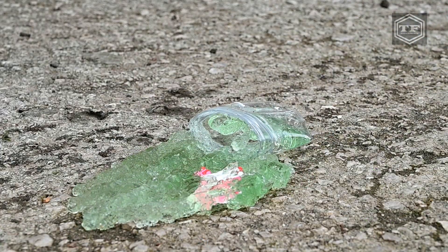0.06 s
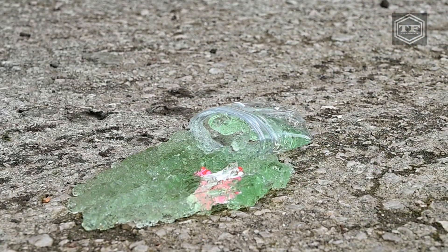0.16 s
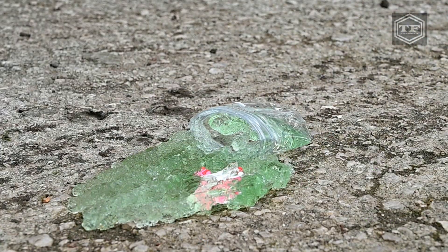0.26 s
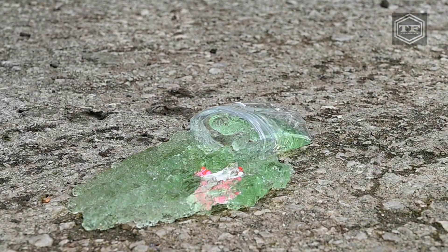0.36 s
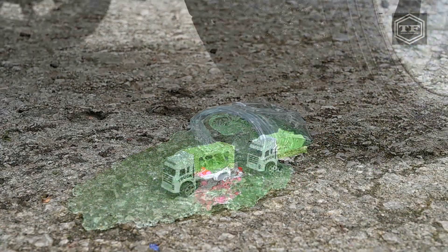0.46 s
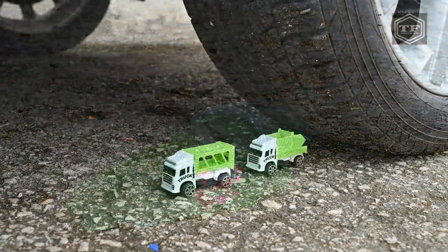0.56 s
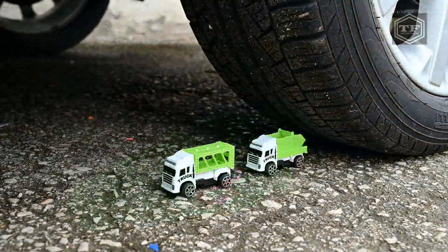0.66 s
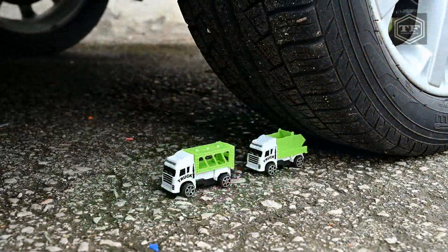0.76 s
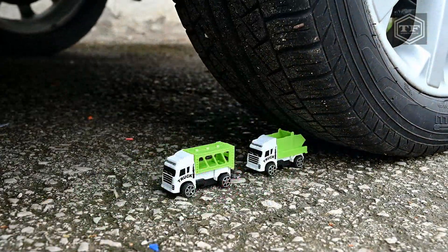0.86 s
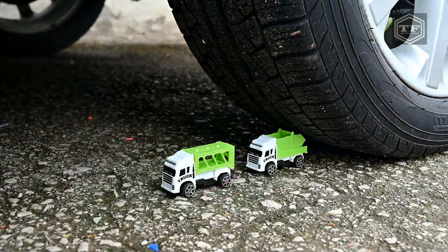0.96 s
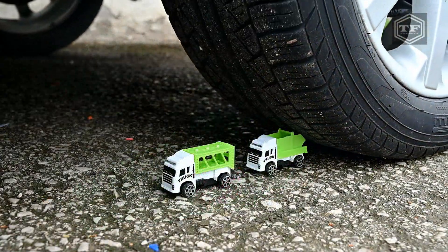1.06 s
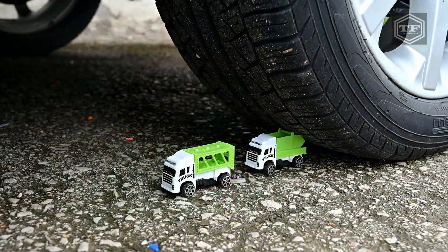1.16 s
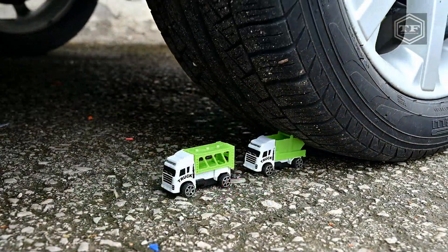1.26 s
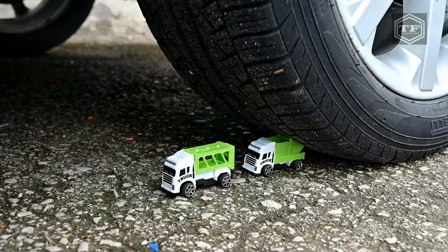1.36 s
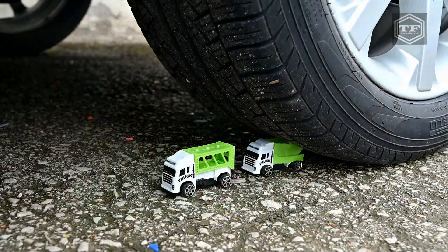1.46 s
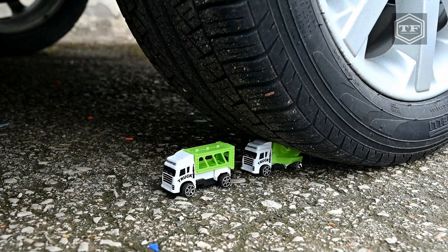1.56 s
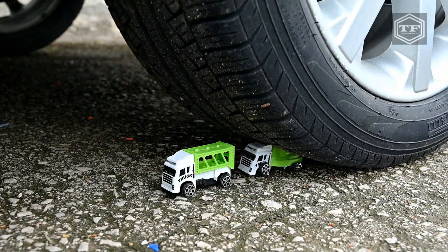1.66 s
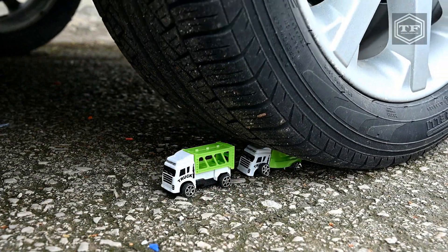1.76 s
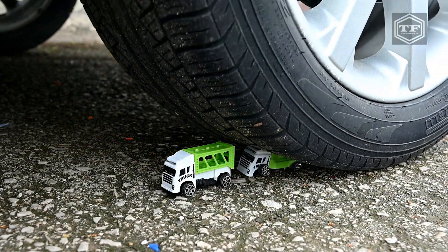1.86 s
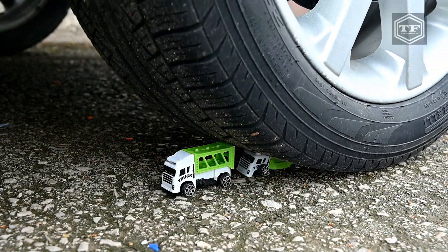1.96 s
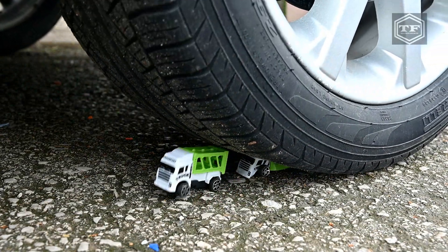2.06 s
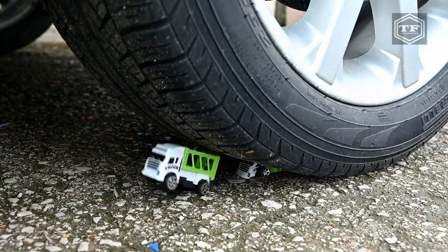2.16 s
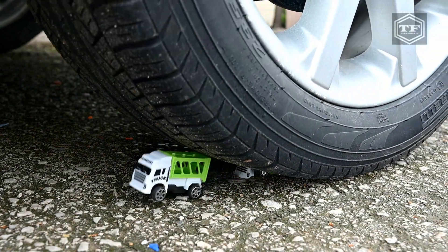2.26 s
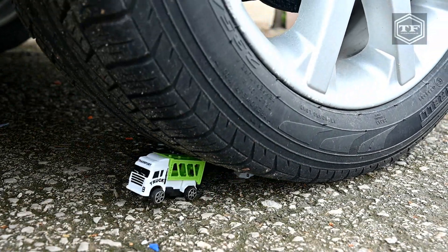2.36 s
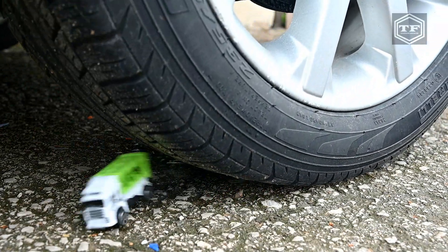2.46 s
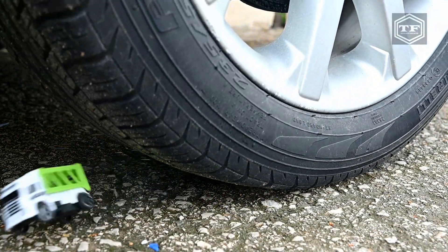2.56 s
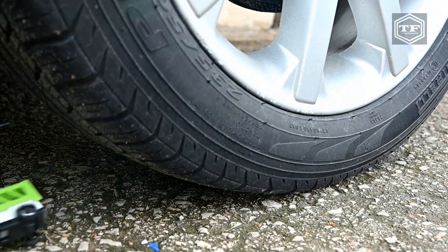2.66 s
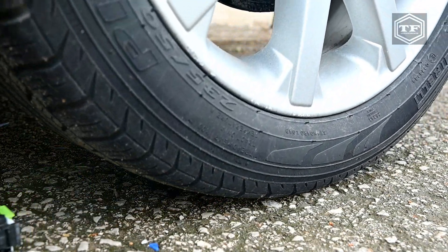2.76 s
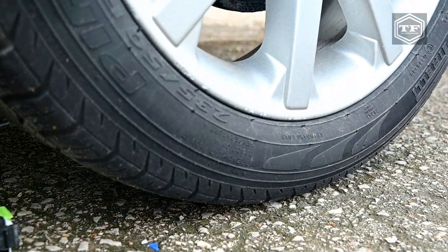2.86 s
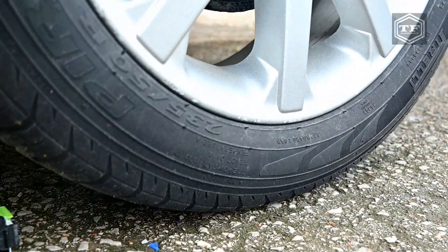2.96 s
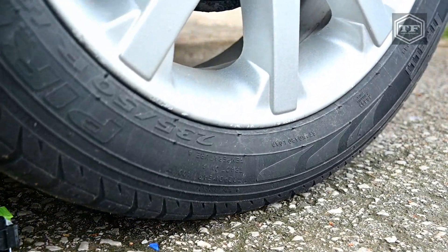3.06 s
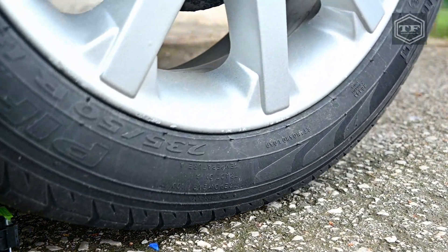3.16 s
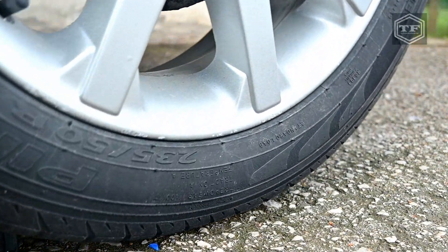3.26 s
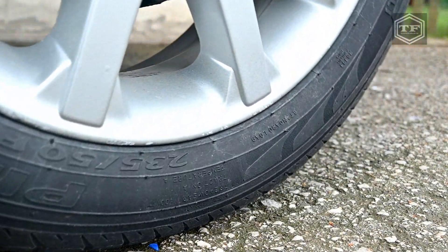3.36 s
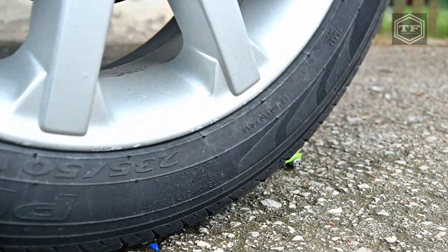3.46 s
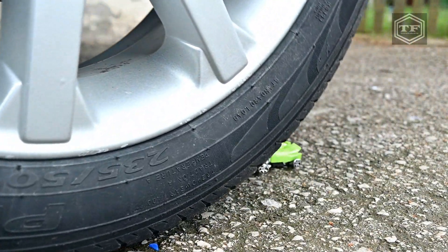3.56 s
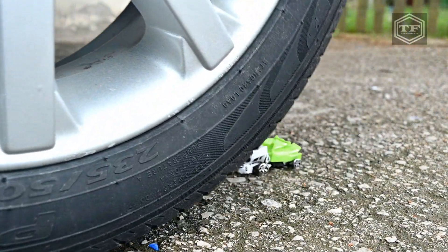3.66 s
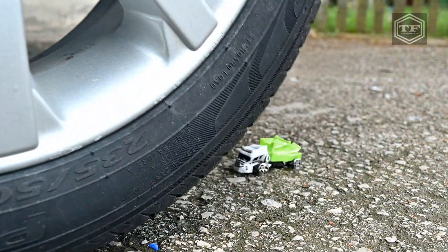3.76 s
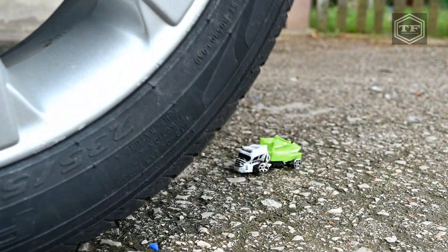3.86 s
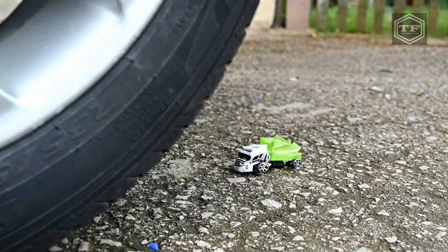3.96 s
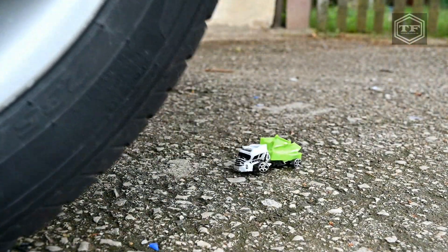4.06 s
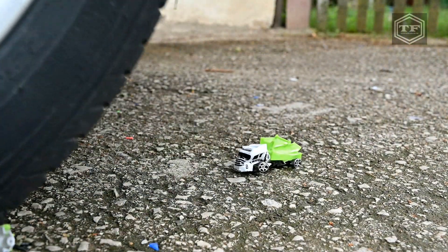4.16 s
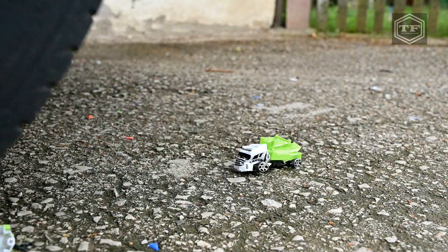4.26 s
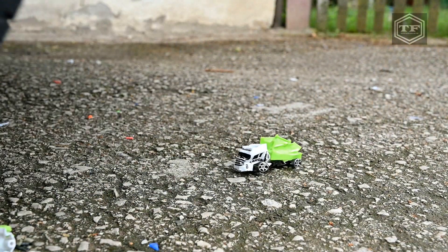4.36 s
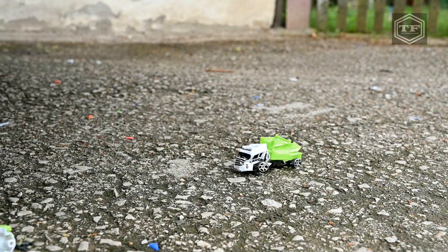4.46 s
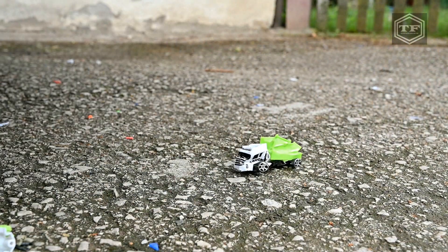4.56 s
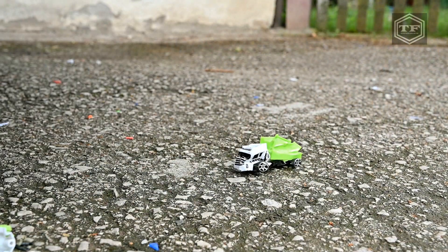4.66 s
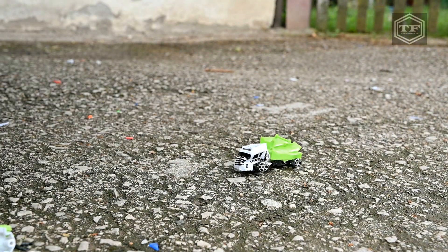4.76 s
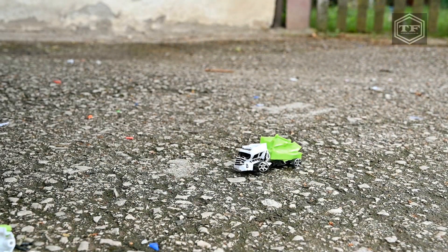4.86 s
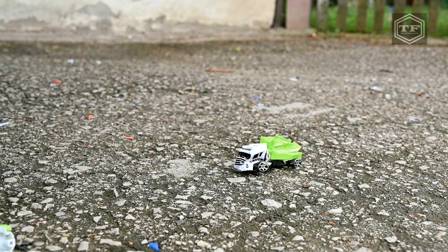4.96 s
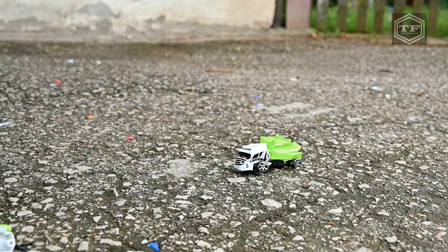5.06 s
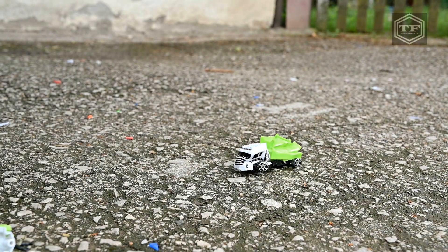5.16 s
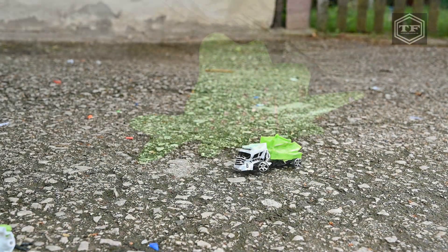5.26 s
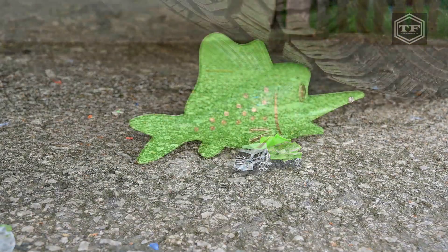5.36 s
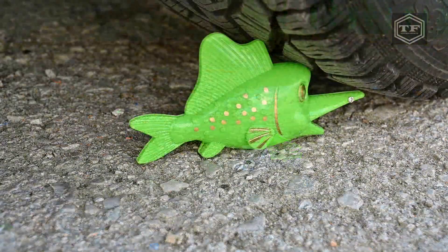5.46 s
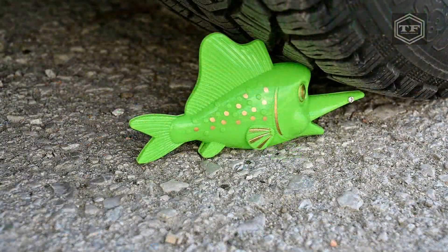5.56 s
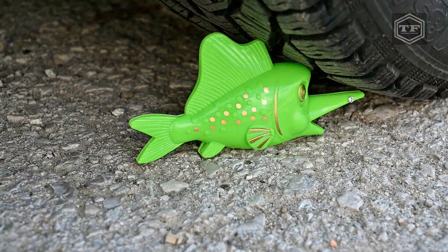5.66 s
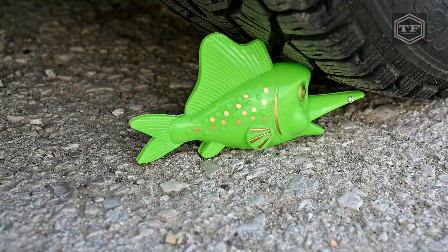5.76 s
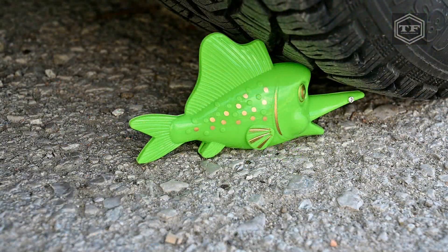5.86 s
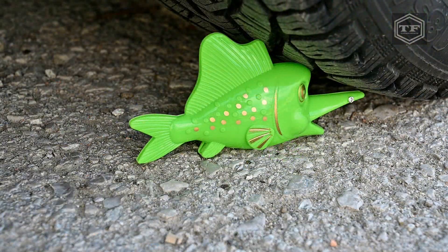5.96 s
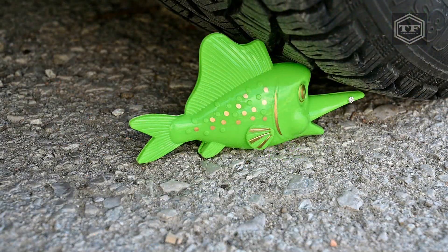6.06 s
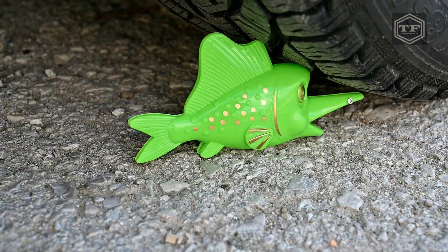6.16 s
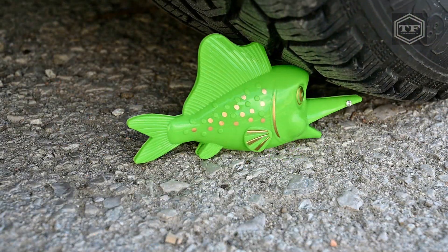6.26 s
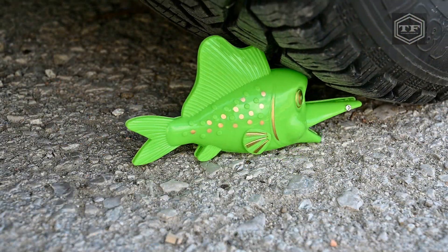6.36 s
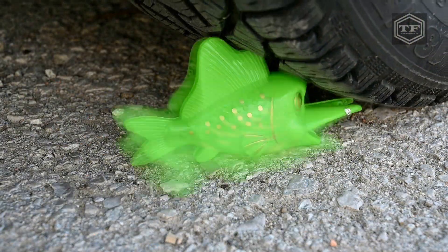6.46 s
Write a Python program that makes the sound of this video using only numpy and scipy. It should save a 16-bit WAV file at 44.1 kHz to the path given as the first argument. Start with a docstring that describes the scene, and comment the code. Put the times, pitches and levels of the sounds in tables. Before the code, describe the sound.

Close up outdoors on rough asphalt. Low rumble and a brief wet fizz come first, then a faint bird trill. A slow car tyre cracks thin plastic in scattered sharp snaps, and after a near pause a denser, louder crunch with a heavy thud. Grit ticks and an engine drones faintly. A thin high brake squeal follows, then distant birds whistle and another hard plastic toy snaps.

```python
"""Car crushing plastic toys

A car creeps over two small plastic toy trucks on rough asphalt, then onto a hollow plastic fish, up close.
Each break is a snap and a run of noisy slips, ringing splinters, the shell wall and the air in the tyre.
Shaped noise makes the rumble, scrubbing tread, crackling sand, wet slime, still air and far bird chorus.
Sines make the engine drone, a faint hum, soft tyre thuds, one thin brake squeal and the whistled birdsong.
The shells crack loudly enough to overload the microphone input."""
import sys
import numpy as np
from scipy import signal
from scipy.fft import rfft, irfft, next_fast_len
from scipy.io import wavfile
from scipy.ndimage import uniform_filter1d, map_coordinates

SR = 44100
rng = np.random.default_rng(int(sys.argv[2]) if len(sys.argv) > 2 else 0)


def to_wav(sig):
    """Store sig (one row per channel, or 1-D mono) as 16-bit WAV at the path in sys.argv[1].

    Samples outside -1..1 are clipped; the rate is SR.
    """
    pcm = np.clip(np.atleast_2d(sig), -1, 1) * 32767
    pcm = np.round(pcm).astype(np.int16)
    wavfile.write(sys.argv[1], SR, pcm.T)  # frames by channels


N = 287091

# breaks of plastic: (t/s, knock level/dB, crack level/dB, fizz level/dB, tearing time/s)
BREAKS = [(1.4487, -25, -28, -8.5, 0.0083), (1.4696, -38.5, -27.5, -14.5, 0.011),
          (1.5645, -61.5, -69.5, -30.5, 0.004), (1.6184, -16, -17, -8.5, 0.0064),
          (1.6942, -24, -20, -7.5, 0.0037), (1.7125, -38.5, -38, -16, 0.0053),
          (1.8187, -38.5, -37, -42.5, 0.0044), (2.0823, -45, -44.5, -37.5, 0.0078),
          (2.2691, -16, -16.5, -10.5, 0.011), (2.3104, -12, -17, -12.5, 0.0082),
          (2.3523, -62, -42, -29.5, 0.0011), (2.4433, -35, -36.5, -34.5, 0.006),
          (2.4934, -18, -15, -16.5, 0.012), (2.5297, -24.5, -28, -18.5, 0.0072),
          (2.6006, -30.5, -51, -33.5, 0.0068), (2.6117, -35, -41, -39, 0.0052),
          (2.6654, -31, -31.5, -20, 0.0066), (2.7791, -54, -33.5, -38, 0.0088),
          (3.132, -54.5, -50, -34, 0.0022), (3.2489, -49, -46, -30, 0.0037),
          (3.3556, -29.5, -32.5, -27, 0.0085), (3.3822, -21.5, -32.5, -20, 0.0093),
          (3.41, -17, -29, -24, 0.0065), (3.4928, -30, -28.5, -25, 0.011), (3.5083, -20, -33, -49, 0.0062),
          (3.5216, -33, -34, -30, 0.0038), (3.587, -15.5, -27.5, -23, 0.006),
          (3.6056, -14.5, -18, -10.5, 0.012), (3.6196, -20, -23, -12.5, 0.0046),
          (3.6711, -8.5, -19.5, -7, 0.023), (3.6966, -10, -11, -10.5, 0.0095),
          (3.709, -16, -18, -12.5, 0.0074), (3.7717, -12.5, -26, -30, 0.0081),
          (3.7968, -19.5, -38.5, -25.5, 0.0083), (3.8193, -28, -40, -30.5, 0.0054),
          (3.9256, -20.5, -29.5, -18.5, 0.0062), (4.161, -37.5, -36, -37.5, 0.0018),
          (4.213, -35.5, -36.5, -37, 0.011), (4.2372, -36.5, -39, -27.5, 0.013),
          (6.36, -17.5, -19, -23.5, 0.0033), (6.4039, -40, -32, -15, .0028),
          (6.4384, -29.5, -19.5, -16, 0.003), (6.4949, -38, -35.5, -39, 0.0032)]
# sand grinding under the load: (t/s, level/dB)
SAND_GRINDING = [(0, -53), (.6, -65.5), (.85, -72.5), (1.4, -71.5), (1.65, -47.5), (1.9, -65.5),
                 (2.15, -57.5), (2.3, -44.5), (2.7, -53.5), (3, -73), (3.3, -62), (3.75, -38.5), (4, -59.5),
                 (4.24, -46), (4.5, -68.5), (4.9, -63.5), (5.8, -85.5), (6.3, -71)]
# how alike left and right are: (f/Hz, likeness from 0 to 1)
LEFT_RIGHT_LIKENESS = [(60, 1), (500, 0.9), (1000, 0.8), (2500, 0.3), (12000, 0.65)]


def amp(db):
    """Decibels to gain."""
    return 10 ** (np.asarray(db) / 20)


def unit(x):
    """Scale to rms 1."""
    return x / np.sqrt(np.mean(x ** 2) + 1e-20)


def burst(x):
    """Scale a short sound to the energy of 10 ms at rms 1."""
    return unit(x) * np.sqrt(SR / 100 / x.shape[-1])


def along(points, hz):
    """Read (f/Hz, value) points on a logarithmic frequency axis."""
    f, values = np.transpose(points)
    return np.interp(np.log(hz + 1), np.log(f + 1), values)


def curves(rows):
    """Draw one curve over the whole sound for each column after the time."""
    times, *columns = np.transpose(rows)
    return [np.interp(np.arange(N) / SR, times, column) for column in columns]


def wobble(rate):
    """A smooth random curve with rate knots a second."""
    knots = rng.standard_normal(int(N * rate / SR) + 4)
    return map_coordinates(knots, [np.arange(N) * rate / SR])


def fade(t, t60):
    """Free decay, 60 dB down after t60 seconds."""
    return np.exp(-np.log(1000) * t / np.maximum(t60, 1e-4))


def filtered(x, response):
    """Multiply the spectrum of x by a function of frequency."""
    n = x.shape[-1]
    m = next_fast_len(n + 4096)
    return irfft(rfft(x, m) * response(np.fft.rfftfreq(m, 1 / SR)), m)[..., :n]


def coloured(x, bands):
    """Colour x by the summed power of (dB, shape) bands, without smearing sound ahead of an attack."""
    hz = np.fft.rfftfreq(1024, 1 / SR)
    power = sum((amp(db) * unit(amp(along(shape, hz)))) ** 2 for db, shape in bands)
    gain = np.sqrt(power)
    # folding the cepstrum gives the minimum-phase filter, whose energy comes first
    fold = np.r_[1, np.full(511, 2), np.zeros(512)]
    response = irfft(np.exp(rfft(irfft(np.log(gain)) * fold)))
    shaped = signal.fftconvolve(x, response[None], axes=1)[:, :x.shape[1]]
    return np.sqrt(np.mean(gain ** 2)) * burst(shaped)


def add(track, s, x):
    """Mix a stereo sound in at time s."""
    i = min(max(round(s * SR), 0), N - 1)
    track[:, i:i + x.shape[-1]] += x[..., :N - i]


def balance(db):
    """Left and right gains that differ by db, positive towards the left."""
    return amp([[db / 2], [-db / 2]])


def tone(hz):
    """A sine of rms 1 along a pitch curve."""
    return np.sqrt(2) * np.sin(2 * np.pi * np.cumsum(hz) / SR)


def rush(spectrum, grain_db=0):
    """Stereo noise of rms 1; grain_db scatters the sizes of its tiny impulses."""
    pair = rng.standard_normal((2, N)) * amp(grain_db * rng.standard_normal(N))

    def mid_side_gain(hz):
        angle = np.arccos(np.clip(along(LEFT_RIGHT_LIKENESS, hz), -1, 1)) / 2
        return amp(along(spectrum, hz)) * np.array([np.cos(angle), np.sin(angle)])

    mid, side = filtered(pair, mid_side_gain)
    return unit(np.array([mid + side, mid - side]))


def exhaust_rumble():
    """Low noise from the exhaust swells and sinks."""
    # loudness: (t/s, level/dB)
    loudness = [(0, -38), (.25, -56), (.43, -30), (.6, -35.5), (.75, -53.5), (1.25, -66.5), (1.5, -60),
                (1.66, -45.5), (1.9, -54), (2.55, -44.5), (3, -56), (3.72, -42.5), (4.05, -50),
                (5.1, -53.5), (5.45, -45), (5.8, -72.5), (6.2, -45), (6.51, -47.5)]
    # spectrum: (f/Hz, level/dB per Hz)
    spectrum = [(11, -31), (18, 6), (45, -6.5), (80, -10), (220, -21), (290, -44), (480, -120)]
    return amp(curves(loudness)[0] + 1.3 * wobble(2.0)) * rush(spectrum)


def tread_scrub():
    """The tread scrubs the asphalt in grainy noise."""
    # loudness: (t/s, level/dB)
    loudness = [(0, -45.5), (.62, -47), (.76, -71.5), (1.25, -68), (1.65, -57), (2.1, -69), (2.5, -45),
                (2.95, -66), (3.2, -66), (3.52, -42), (3.8, -39), (4, -54.5), (4.4, -61), (5.25, -55),
                (5.65, -65.5), (6.03, -63), (6.2, -45), (6.36, -63.5)]
    # spectrum: (f/Hz, level/dB per Hz)
    spectrum = [(65, -21.5), (110, 7), (167, -10.5), (224, 2.5), (312, -9.5), (355, -7), (417, -9.5),
                (1160, -12.5), (2940, -22.5), (3500, -25.5), (4550, -54), (7700, -120)]
    return amp(curves(loudness)[0] + 3.7 * wobble(30)) * rush(spectrum, grain_db=6.0)


def sand_crackle():
    """Sand crackles under the load: noise impulses of very uneven size, quickly changing in level."""
    # spectrum: (f/Hz, level/dB per Hz)
    spectrum = [(600, -16), (1500, 2), (3000, 2), (6000, 1), (10000, 0), (16000, -4)]
    level_db = curves(SAND_GRINDING)[0] - 1 + 2.5 * wobble(90)
    return amp(level_db) * rush(spectrum, grain_db=8)


def outdoor_air():
    """Still outdoor air is a steady, faint noise."""
    # spectrum: (f/Hz, level/dB per Hz)
    spectrum = [(20, 0), (110, -1), (260, -13), (500, -17), (1200, -17), (2000, -23), (3500, -23),
                (6000, -25), (10000, -28), (16000, -33)]
    return amp(-64) * rush(spectrum)


def hum():
    """A faint hum of one unsteady pitch comes and goes."""
    # hum: (t/s, level/dB, f/Hz)
    path = [(0, -58.5, 338.5), (.12, -44, 357.6), (.2, -53, 386), (.3, -79.5, 363), (5.2, -85.5, 354.8),
            (5.5, -66.5, 346.4), (6.05, -69, 341), (6.3, -63, 352)]
    level_db, hz = curves(path)
    return amp(level_db + 1.6 * wobble(36)) * tone(hz * (1 + 0.0045 * wobble(65)))


def engine():
    """Two orders of the idling engine drone, each wavering in pitch."""
    # loudness: (t/s, level/dB)
    loudness = [(0, -65), (1.3, -77), (2.8, -66), (3.5, -66), (4.1, -54.5), (4.6, -63), (5.2, -73),
                (5.5, -80.5)]
    # engine lines: (f/Hz, level/dB)
    orders = [(160, -1.5), (208, -5)]
    level = amp(curves(loudness)[0] + 2.8 * wobble(14.0))
    return level * sum(amp(db) * tone(hz * (1 + 0.018 * wobble(9.7))) for hz, db in orders)


def bird_chorus():
    """Far birds blur into a twittering band of noise."""
    # loudness: (t/s, level/dB)
    loudness = [(0, -57), (1.15, -75.5), (1.4, -81.5), (5.3, -75), (5.45, -64.5), (5.95, -59),
                (6.35, -60.5), (6.51, -66)]
    # spectrum: (f/Hz, level/dB per Hz)
    spectrum = [(2500, -32), (3800, -16.5), (4500, -2.5), (4950, -2.5), (5400, -10.5), (6500, -14),
                (8000, -42.5)]
    return amp(curves(loudness)[0] + 1.4 * wobble(29)) * rush(spectrum)


def thuds():
    """Soft, damped low thuds: the tyre bumps on the ground, some as a shell gives way."""
    # bumps: (t/s, level/dB, f/Hz)
    bumps = [(0.014, -33.5, 143), (0.462, -29.5, 165), (0.536, -27, 310), (0.82, -35.5, 269),
             (1.449, -23.5, 239), (1.619, -28.5, 180), (2.323, -28.5, 139), (2.492, -21, 206),
             (2.521, -21, 129.3), (3.384, -30, 185), (3.434, -23, 155), (3.698, -19, 81.8),
             (3.719, -10, 148), (5.149, -40, 268.1), (6.127, -31, 285), (6.15, -32.5, 165),
             (6.211, -29.5, 121)]
    cycles = 16  # a beat dies by 60 dB within this many cycles
    out, t = np.zeros((2, N)), np.arange(SR // 3) / SR
    for s, db, hz in bumps:
        beat = np.sin(2 * np.pi * hz * t)
        beat = beat + .2 * np.sin(2 * np.pi * hz * .62 * t)
        beat = beat + .3 * np.sin(2 * np.pi * hz * 1.7 * t)
        soft_attack = 1 - np.exp(-t / 0.0035)
        add(out, s, amp(db) * beat * fade(t, cycles / hz) * soft_attack)
    return out


def yard(x, stretch=1):
    """The underbody and the house wall echo x as a fading noise tail, with its own decay at each pitch."""
    # decay of the echo: (f/Hz, t60/s)
    decay = [(150, 0.35), (500, 0.12), (1400, 0.19), (4000, 0.16), (10000, 0.1), (16000, 0.011)]
    hz, t, z = signal.stft(rng.standard_normal((2, SR // 2)), SR, nperseg=256)
    z = z * fade(t, stretch * along(decay, hz)[:, None])
    tail = signal.istft(z, SR, nperseg=256)[1]
    tail = tail * (1 - np.exp(-np.arange(tail.shape[1]) / SR / 0.00091))
    # the bass arrives alike on both sides
    middle = tail.mean(axis=0)
    tail = middle + filtered(tail - middle, lambda f: 1 - np.clip(along(LEFT_RIGHT_LIKENESS, f), 0, 1) ** 2)
    return signal.fftconvolve(x, tail / np.linalg.norm(tail[0]), axes=1)[:, :N]


def shard(t, t60, ring_db, count=14):
    """A splinter answers one slip with a click and a few short modes of its own."""
    hz = np.exp(rng.uniform(np.log(1500), np.log(15000), (count, 1)))
    # the two sides hear somewhat different phases
    phase = rng.uniform(0, 2 * np.pi, (count, 1)) + .6 * rng.standard_normal((2, count, 1))
    modes = np.sin(2 * np.pi * hz * t + phase) * fade(t, t60 * np.sqrt(hz.mean() / hz))
    click = burst(1.0 * (t == 0))
    return click + amp(ring_db) * burst(modes.sum(axis=1))


def fracture(knock_db, crack_db, fizz_db, knock_hz, tearing):
    """One break: a first snap, then clumps of smaller slips, heard in the splinters and the shell wall."""
    # wall modes: (ratio to knock pitch, level/dB, t60/s)
    wall_modes = [(0.549, -17.5, 0.025), (.8, -4.5, 0.01), (1.001, 11.5, 0.026), (1.22, 8, 0.009),
                  (1.548, -4.5, 0.015)]
    # colours of the dull body, crack and fizz: (f/Hz, level/dB)
    body_band = [(120, -24), (350, -9), (750, 2.5), (1350, 0.5), (1900, -11), (3500, -29)]
    crack_band = [(300, -30), (1200, -6.5), (2000, -1.5), (3200, 2), (5600, 1.5), (6800, -3.5), (9000, -23)]
    fizz_band = [(2000, -28), (4000, -9.5), (5500, -4), (9000, 1.5), (13000, -0.5), (16000, -3.5)]
    snap_t60, even_tearing = .0016, .0045  # s; at this tearing time snap and slips weigh the same
    scatter_t60, scatter_db = .08, -12  # scatter: decay in s, level for a tearing time of 6.7 ms

    t = np.arange(SR // 10) / SR
    common, apart, sizes = rng.standard_normal((3, len(t)))
    clumps = amp(3.0 * unit(uniform_filter1d(sizes, size=20)))
    run = np.exp(-t / tearing) * clumps
    pair = np.array([common + .32 * apart, common - .32 * apart])
    # a shorter, cleaner break puts more of its energy into the first snap
    snap = (even_tearing / tearing) ** 1.5
    slips = burst(snap * burst(pair * fade(t, snap_t60)) + burst(run * pair))
    # the wheel arch and the ground scatter each break for some tens of milliseconds
    scatter = burst(rng.standard_normal((2, len(t))) * fade(t, scatter_t60))
    slips = slips + amp(scatter_db) * np.sqrt(tearing / 0.0067) * scatter
    bright = signal.fftconvolve(slips, shard(t, t60=.0025, ring_db=-8), axes=1)[:, :len(t)]
    crack = coloured(bright, [(knock_db - 4, body_band), (crack_db + .5, crack_band), (fizz_db + 1.6, fizz_band)])

    wall = np.zeros(len(t))
    for ratio, db, t60 in wall_modes:
        level = amp(db + rng.normal(0, 0.5))
        hz = knock_hz * ratio * rng.normal(1, 0.068)
        wall += level * np.sin(2 * np.pi * hz * t) * fade(t, t60)
    blow = snap * burst(1.0 * (t == 0)) + 0.22 * slips.mean(axis=0)
    knock = signal.fftconvolve(wall, blow)[:len(t)]
    left, right = amp(knock_db - 2.0) * burst(knock) + balance(1.8) * crack
    lag = rng.integers(0, 5)  # the right side hears it up to four samples later
    return np.array([left, np.pad(right, (lag, 0))[:len(t)]])


def pebbles(count=26):
    """Small stones caught at random, following the grinding load: (t/s, knock dB, crack dB, fizz dB)."""
    times = (np.arange(count) + rng.random(count)) / count * N / SR
    # 7 dB over the sand curve, with chance scatter
    levels = np.interp(times, *np.transpose(SAND_GRINDING)) + 7 + 3.5 * rng.standard_normal(count)
    return list(zip(times, levels - 3, levels, levels))


def grit():
    """Stones shift and tick under the tread, each a small fracture."""
    # single stone ticks at set times: (t/s, knock level/dB, crack level/dB, fizz level/dB)
    stones = [(0.1031, -50, -41.5, -44.5), (0.2161, -42.5, -57.5, -69), (0.5893, -55, -58, -44.5),
              (0.62, -43.5, -57, -53.5), (0.9201, -61, -56, -64), (0.966, -59, -52, -62),
              (1.188, -45.5, -52.5, -57), (1.2632, -57.5, -46.5, -56), (1.9345, -55, -50.5, -43.5),
              (2.1685, -57, -39, -49), (2.8289, -52, -42.5, -54.5), (4.0239, -47, -42.5, -54),
              (4.1023, -50, -46, -46), (4.2661, -41, -42.5, -36.5), (4.41, -59.5, -57, -47.5),
              (5.1037, -44.5, -44, -50.5), (5.284, -47.5, -49, -49.5), (6.2328, -45, -48, -67)]
    stone_hz, slip_s = 1050, .0045  # middle knock pitch in Hz, slip time in s
    out = np.zeros((2, N))
    for s, knock_db, crack_db, fizz_db in list(stones) + pebbles():
        add(out, s, fracture(knock_db, crack_db, fizz_db, stone_hz * rng.lognormal(0, .2), slip_s))
    return out


def squelch():
    """Slime pressed from a cup spits out in a short wet fizz of grainy noise."""
    # loudness: (t/s, level/dB)
    loudness = [(.4, -120), (.43, -85), (.446, -33), (.453, -24.5), (.475, -27), (.495, -31), (.515, -43.5),
                (.56, -60), (.65, -120)]
    # spectrum: (f/Hz, level/dB per Hz)
    spectrum = [(240, -40), (400, -6), (598, -24), (676, 1.5), (826, -15.5), (2180, -9), (3020, -16.5),
                (5350, -9.5), (7060, -15.5), (10400, -2.5), (16000, -14)]
    return amp(curves(loudness)[0] + 0.67 * wobble(200)) * rush(spectrum, grain_db=8.0)


def trill(count=7):
    """An even run of faint falling notes, as timed rows."""
    # one note: (length/s, start f/Hz, middle f/Hz, end f/Hz, level/dB)
    note = (0.16, 5347, 4648.5, 4199, -75.5)
    start_s, period_s = .708, .066
    return [(start_s + k * period_s, *note) for k in range(count)]


def birdsong():
    """After a falling trill, a distant bird whistles slurred phrases between arched calls: gliding sines."""
    # phrase: (t/s into the phrase, length/s, start f/Hz, middle f/Hz, end f/Hz, level/dB)
    phrase = [(0, .11, 6700, 6000, 6200, -58), (.078, .038, 4250, 5800, 4700, -51),
              (.097, .05, 4600, 3900, 3270, -49)]
    # when the phrase begins: (t/s)
    phrase_starts = [5.529, 6.018]
    # one low whistle: (t/s, length/s, start f/Hz, middle f/Hz, end f/Hz, level/dB)
    low_whistle = (5.943, .06, 3305, 3090, 2970, -55)
    # shape of an arched call: (length/s, start f/Hz, middle f/Hz, end f/Hz)
    arch = (0.056, 2950, 4500, 2900)
    # arched calls: (t/s, level/dB)
    calls = [(5.338, -55.5), (5.705, -49), (5.89, -55.5), (6.187, -49.5)]
    notes = [(start + s, *note) for start in phrase_starts for s, *note in phrase]
    notes += trill() + [low_whistle] + [(s, *arch, db) for s, db in calls]
    out = np.zeros((2, N))
    for s, length, start_hz, middle_hz, end_hz, db in notes:
        u = np.linspace(0, 1, int(length * SR))
        # the pitch flutters by 2.5 % at 170 Hz
        flutter = 1 + .025 * np.sin(2 * np.pi * (170 * length * u + rng.random()))
        hz = np.interp(u, [0, .5, 1], [start_hz, middle_hz, end_hz]) * flutter
        swell = np.sqrt(np.abs(np.sin(np.pi * u)))
        add(out, s, amp(db) * swell * (tone(hz) + amp(-23) * tone(2 * hz)))
    distant = .65 * out + .65 * yard(out, stretch=2.2)
    return amp(-2.5 + 3.2 * wobble(110)) * distant


def plastic():
    """The toys break up under the tread; soon after a long tear a weaker splinter snaps off."""
    wall_hz, wall_tearing_s = 942, .006  # middle wall pitch at this tearing time
    long_tear_s = .0065  # breaks no longer than this shed no splinter
    out, ports = np.zeros((2, N)), balance(-0.5)
    for s, knock_db, crack_db, fizz_db, tearing in BREAKS:
        size, wait = rng.random(2)
        # a longer tear frees a larger, lower piece; chance shifts the pitch by up to 8 %
        knock_hz = wall_hz * (wall_tearing_s / tearing) ** .15 * (1 + .08 * (2 * size - 1))
        add(out, s, ports * fracture(knock_db, crack_db, fizz_db, knock_hz, tearing))
        if tearing > long_tear_s:
            splinter = fracture(knock_db, crack_db, fizz_db, knock_hz=1150, tearing=.003)
            delay_s = .0088 + .036 * wait
            add(out, s + delay_s, amp(-24) * ports * splinter)
    return out


def tyre():
    """Each break kicks the rubber and rings the resonances of the air in the tyre."""
    # air resonances: (f/Hz, level/dB, t60/s)
    cavity = [(208, -12, .9), (409, 2, .4), (598, -7, .4), (797, -2, .36), (991, -1, .45), (1184, -13, .42),
              (1565, -13, .25)]
    # how hard a break drives the air, most while the first truck is flattened: (t/s, level/dB)
    coupling = [(1.6, -29.5), (2.25, -22), (2.7, -23.5), (3.4, -32)]
    kicks, t = np.zeros(N), np.arange(SR) / SR
    for s, knock_db, crack_db, *_ in BREAKS:
        lag_s = .005 * rng.random()  # each kick falls at a chance moment up to 5 ms after its break
        kicks[min(round((s + lag_s) * SR), N - 1)] = amp(knock_db) + .5 * amp(crack_db)
    ring = sum(amp(db) * np.sin(2 * np.pi * hz * t) * fade(t, t60) for hz, db, t60 in cavity)
    return signal.fftconvolve(kicks * amp(curves(coupling)[0]), ring)[:N]


def brake_squeal():
    """Close modes of the brake disc beat together in one thin squeal, to the left."""
    # loudness: (t/s, level/dB)
    loudness = [(5.17, -140), (5.19, -90), (5.225, -47), (5.272, -36), (5.345, -44), (5.385, -59),
                (5.54, -90), (5.6, -140)]
    # disc modes: (f/Hz, level/dB)
    disc = [(12511, 0), (12462, -7), (14120, -28)]
    drift = 1 + 0.0011 * wobble(12)
    squeal = amp(curves(loudness)[0]) * sum(amp(db) * tone(hz * drift) for hz, db in disc)
    return squeal * balance(4)


def scene():
    """Breaking plastic, stones and thuds with their echo, among the sounds of the car and the garden."""
    # echo of the blows, weaker at the fish, which lies clear of the underbody: (t/s, level/dB)
    echo = [(0, -12), (4.5, -12), (6, -17)]
    rolling = exhaust_rumble() + tread_scrub() + sand_crackle() + outdoor_air()
    car = hum() + engine() + brake_squeal()
    birds = bird_chorus() + birdsong()
    blows = thuds() + grit() + plastic()
    echoes = amp(curves(echo)[0]) * yard(blows)
    return rolling + car + birds + blows + echoes + squelch() + tyre()


def record(dry):
    """The input stage flattens the loudest cracks; a steep filter removes what lies above 16 kHz."""
    clipped = dry / (1 + np.abs(dry / .66) ** 6) ** (1 / 6)
    return filtered(clipped, lambda hz: 1 / (1 + (hz / 16000) ** 160))


dry = scene()
out = record(dry)
to_wav(out)
```